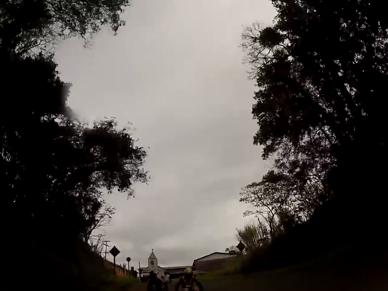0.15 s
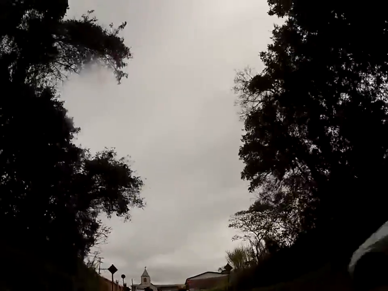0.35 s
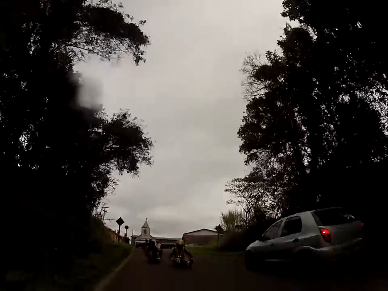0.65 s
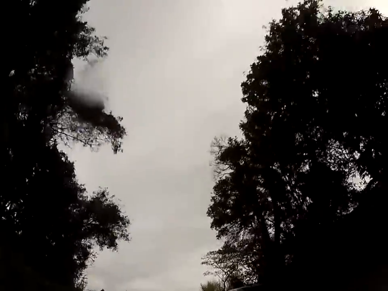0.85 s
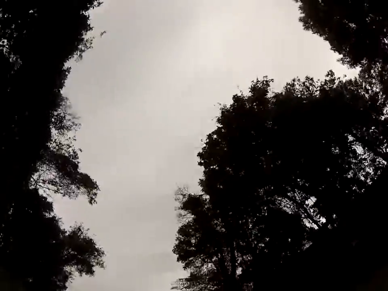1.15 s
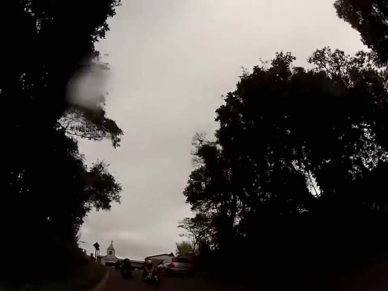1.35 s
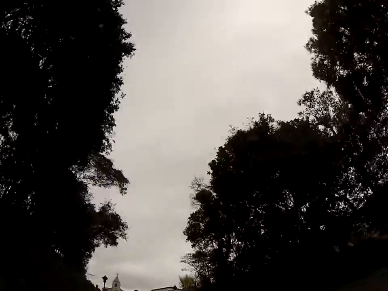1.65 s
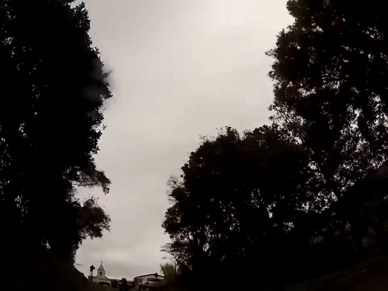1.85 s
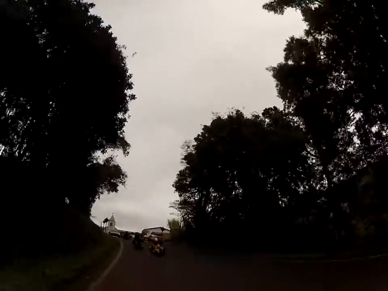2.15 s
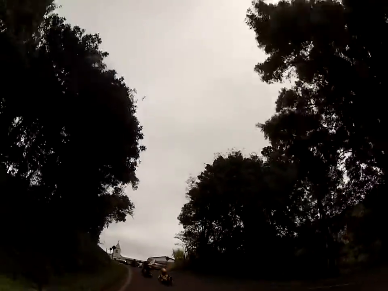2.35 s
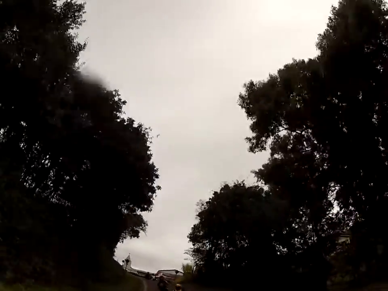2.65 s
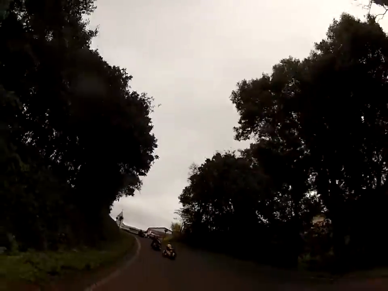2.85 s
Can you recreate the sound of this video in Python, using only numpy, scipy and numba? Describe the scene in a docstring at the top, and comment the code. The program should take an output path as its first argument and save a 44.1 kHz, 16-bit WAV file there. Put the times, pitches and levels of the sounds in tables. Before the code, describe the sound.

Continuous coarse rolling roar and faint gritty wheel hiss on a tree-lined road, with scattered rattles, a few thuds and one violent late knock, heard close through a gritty, nearly mono board-mounted microphone with low wind buffeting.

```python
"""Wheeled board on rough asphalt

A low wheeled board rolls downhill on asphalt, heard by a small microphone strapped to it.
Road grit excites deck resonances into a low roar; flickering bands of noise make the wheel hiss.
Seam slams and loose fittings are damped modes and noise bursts; low noise is wind on the port.
Hard peaks drive a gain control down; a low-rate sample-and-hold mirrors the sound upward."""
import sys
import numpy as np
from scipy import signal
from scipy.io import wavfile
from scipy.ndimage import uniform_filter1d
from numba import njit

SR = 44100
rng = np.random.default_rng(int(sys.argv[2]) if len(sys.argv) > 2 else 0)


def to_wav(s):
    """Save 16-bit WAV."""
    ch = np.atleast_2d(s).T  # columns
    pcm = np.round(np.clip(ch, -1, 1) * 32767)  # PCM
    wavfile.write(sys.argv[1], SR, pcm.astype(np.int16))


def level_to_linear(level):
    """Convert decibel levels to linear amplitude factors, elementwise."""
    exponent = np.asarray(level, float) / 20
    return 10 ** exponent


N = 132300  # samples, 3 s


def rms_one(x):
    """Normalization: scale to unit root-mean-square."""
    return x / np.sqrt(np.mean(x ** 2) + 1e-20)


def drift(rate_hz):
    """Low-pass noise: two equal real poles give a slow random course of unit rms."""
    pole = np.exp(-2 * np.pi * rate_hz / SR)
    settle = 9000  # samples dropped while the filter settles
    course = signal.lfilter([1], [1, -2 * pole, pole ** 2], rng.standard_normal(N + settle))
    return rms_one(course[settle:])


def cut(x, hz, kind, order=2):
    """Butterworth filtering: a maximally flat passband."""
    sos = signal.butter(order, hz, kind, fs=SR, output="sos")
    return signal.sosfilt(sos, x + 1e-18)


def ring(x, hz, t60):
    """Damped mode: a unit click starts a decaying sine of initial height one."""
    radius, angle = level_to_linear(-60 / (t60 * SR)), 2 * np.pi * hz / SR
    return signal.lfilter([0, np.sin(angle)], [1, -2 * radius * np.cos(angle), radius ** 2], x + 1e-18)


def swell(clicks, rise_s):
    """Critically damped response: each click becomes a short hump of the same height."""
    pole = np.exp(-1 / (rise_s * SR))
    return signal.lfilter([np.e * (1 - pole)], [1, -2 * pole, pole ** 2], clicks + 1e-18)


def grains(per_s, spread_db):
    """Random impulse train: chance clicks of uneven size and sign."""
    happens = rng.random(N) < per_s / SR
    height = level_to_linear(spread_db * np.minimum(rng.exponential(1, N), 4))
    return happens * height * rng.choice([-1, 1], N)


def marks(times, db):
    """Impulse excitation: clicks of given levels at given times."""
    out = np.zeros(N)
    np.add.at(out, (np.asarray(times) * SR).astype(int), level_to_linear(db))
    return out


# Rolling levels as the load of the wheels on the road varies:
# (time [s], deck boom level [dB], deck drone level [dB], wheel hiss level [dB])
ROLLING_LOAD = [(0, -19, -19.5, -32.5), (.12, -13, -17, -37), (.17, -21, -20.5, -30.5),
                (.22, -11.5, -17.5, -32), (.38, -13.5, -21, -38.5), (.45, -10, -13.5, -33.5),
                (.52, -12, -17, -39.5), (.56, -15, -18, -35), (.68, -14, -18.5, -30.5),
                (.8, -11.5, -15, -32.5), (.99, -16, -16.5, -35.5), (1.048, -7, -15.5, -33),
                (1.13, -8, -12.5, -32), (1.2, -7, -12, -31), (1.3, -14.5, -17, -30.5),
                (1.4, -14, -14.5, -29.5), (1.46, -10, -19.5, -33), (1.55, -14, -16.5, -32.5),
                (1.7, -13.5, -16, -32.5), (1.9, -11, -18, -35.5), (2.1, -15.5, -18.5, -38.5),
                (2.3, -10, -16, -32), (2.4, -20, -21, -37), (2.47, -12.5, -16.5, -29.5),
                (2.64, -15.5, -16, -33.5), (2.76, -16, -15.5, -30.5), (2.8, -17, -15, -37),
                (2.85, -18.5, -22, -39), (2.92, -17.5, -22, -36.5), (3, -14, -12.5, -32)]


def rolling():
    """Shared excitation: one grit drives both deck registers, and its lumps also sway the hiss."""
    time, *columns = np.transpose(ROLLING_LOAD)
    boom, drone, wheels = (level_to_linear(np.interp(np.arange(N) / SR, time, db)) for db in columns)
    lump_db = 1 * drift(29.6)  # 1 dB rms
    grit = grains(per_s=2500, spread_db=3.0) * level_to_linear(lump_db)
    roar = boom * deck_roar(grit, BOOM_MODES) + drone * deck_roar(grit, DRONE_MODES)
    return roar + wheels * wheel_hiss(lump_db)


# Low deck resonances: (frequency [Hz], bandwidth [Hz], relative level [dB])
BOOM_MODES = [(129.6, 19, -11.5), (216.4, 42.4, -3.5), (271, 25.6, 0.5), (316.8, 54.5, -3.5),
              (362.9, 74.4, -7.5)]
# Upper deck resonances: (frequency [Hz], bandwidth [Hz], relative level [dB])
DRONE_MODES = [(456, 32.4, -1.5), (556, 35, -0.5), (627, 68, -1.5), (718, 126, -3.5), (990, 280, -13)]


def deck_roar(grit, modes):
    """Modal resonance: road grit drums parallel two-pole resonators of the deck."""
    out = 0
    for k, (hz, width, db) in enumerate(modes):
        radius = np.exp(-np.pi * width / SR)
        gain = (1 - radius ** 2) / 2
        poles = [1, -2 * radius * np.cos(2 * np.pi * hz / SR), radius ** 2]
        sign = (-1) ** k  # neighbouring modes in opposite phase
        out = out + sign * level_to_linear(db) * signal.lfilter([gain, 0, -gain], poles, grit)
    out = cut(out, 696, "low", order=6)
    return rms_one(cut(out, 180, "high"))


# Colour of the wheel hiss: (frequency [Hz], relative level per hertz [dB])
HISS_COLOUR = [(700, 4), (1000, -12), (1250, 5.5), (1500, 10.5), (2000, 9), (2600, 12), (3200, 9),
               (3800, 3.5), (4400, -22), (4900, -1), (5500, 7)]


def wheel_hiss(lump_db):
    """Modulated band noise: third octaves flicker alone, together and with the lumps of the road."""
    edges = 700 * 2 ** np.arange(0, 3.1, 1 / 3)
    white = rng.standard_normal((2, N))  # neighbouring bands take turns
    hz_points, db_points = np.transpose(HISS_COLOUR)
    out = 0
    for k, (low, high) in enumerate(zip(edges, edges[1:])):
        db = np.interp(np.log(low * high) / 2, np.log(hz_points), db_points)
        own_flicker_db = 2 * drift(45)
        out = out + level_to_linear(db + own_flicker_db) * cut(white[k % 2], [low, high], "band")
    shared_flicker_db = 2.5 * drift(25.6) + 1.3 * drift(130)
    return rms_one(out * level_to_linear(shared_flicker_db + 0.2 * lump_db))


# Hard slams over road seams: (time [s], length [s], thud level [dB], knock level [dB],
# low crack level [dB], high crack level [dB])
SEAM_SLAMS = [(0.527, 0.0011, 6.5, -19.5, -19, -35.5), (0.531, 0.0019, -5, -1, -10.5, -15),
              (2.329, .003, 7, -19.5, -25, -27), (2.765, 0.0053, 10, 10.5, 6.5, 8),
              (2.774, 0.0042, 6, -8, -1, -24), (2.784, 0.009, -12, -5.5, -14, -32)]
THUD_HZ, THUD_T60_S = 527, 0.018


def slams():
    """Repeated impact: a damped thud with four blows spread over the length of each slam."""
    time, length, thud_db, *blow_db = np.transpose(SEAM_SLAMS)
    at = (time[:, None] + length[:, None] * np.linspace(0, 1, num=4)).ravel()
    dull, low, high = (marks(at, np.repeat(db, repeats=4)) for db in blow_db)
    thud = ring(marks(time, thud_db), THUD_HZ, THUD_T60_S)
    return thud + crack(low, high) + knock(dull)


# Jolts of loose fittings: (time [s], low crack level [dB], high crack level [dB], knock level [dB])
FITTING_JOLTS = [(0.062, -20, -42, -14), (0.216, -28, -34, -12.5), (0.2891, -13.5, -40, -9.5),
                 (0.2982, -18.5, -38, -7.5), (0.3297, -21, -38, -36), (0.4324, -14, -15, -19),
                 (0.4418, -5, -19, -24), (0.4488, -18, -39, -24), (0.5098, -20, -39, -10),
                 (0.514, -21, -36, -14), (0.5607, -14, -39, -1), (0.5772, -9, -34, -13),
                 (0.5854, -14, -11, -15), (0.637, -18, -46, -11.5), (0.6799, -20, -39, -18),
                 (0.9156, -16.5, -45, -10.5), (1.0394, -23, -45, -23), (1.1132, -10, -42, -22),
                 (1.1428, -5, -16, -13.5), (1.153, -14, -37, -15), (1.1774, -15, -39, -30),
                 (1.2203, -19, -37, -20), (1.244, -21, -35, -16), (1.268, -16.5, -25, -12),
                 (1.287, -13.5, -41, -8.5), (1.303, -25, -28, -15), (1.3327, -12, -37, -15.5),
                 (1.3425, -18, -29, -25), (1.3591, -12.5, -14, -36), (1.4193, -24, -38, -15),
                 (1.5324, -21, -23, -35), (1.6084, -18.5, -30, -10.5), (1.7728, -21.5, -38, -17.5),
                 (1.828, -15.5, -22, -38), (1.8615, -9, -17, -40), (2.0245, -18.5, -49, -6.5),
                 (2.0328, -17, -48, -9.5), (2.194, -33, -48, -21), (2.213, -19, -31, -9),
                 (2.4377, -21, -39, -21), (2.4914, -21, -39, -9), (2.5473, -15, -39, -13),
                 (2.5716, -34, -33, -11), (2.594, -15.5, -32, -7.5), (2.635, -33, -33, -10),
                 (2.6973, -8.5, -15, -23), (2.7442, -10, -14, -12), (2.8102, -8, -45, -2),
                 (2.818, -14, -51, -5.5), (2.904, -42, -49, -16)]


def jolts():
    """Impact excitation: listed jolts and small random rattles crack and knock the loose fittings."""
    time, low_db, high_db, knock_db = np.transpose(FITTING_JOLTS)
    rattle = level_to_linear(-36.5) * np.abs(grains(per_s=30, spread_db=1))
    low = marks(time, low_db) + rattle
    high = marks(time, high_db) + 1.14 * rattle
    dull = marks(time, knock_db) + 1.7 * rattle
    return crack(low, high) + knock(dull)


CRACK_RISE_S, CRACK_EDGES_HZ = 0.0011, (1560, 3360, 8200)


def crack(low, high):
    """Enveloped noise: bright bursts in two bands, with peaks near the click heights."""
    bottom, middle, top = CRACK_EDGES_HZ
    out = 0
    for clicks, band in ((low, [bottom, middle]), (high, [middle, top])):
        noise = rms_one(cut(rng.standard_normal(N), band, "band"))
        out = out + swell(clicks, CRACK_RISE_S) * noise / 2
    return out


# Modes of the mount: (frequency [Hz], drive level [dB], 60 dB decay time [s])
MOUNT_MODES = [(820, -5, 0.0072), (928, 14.5, 0.012), (1174, -1.5, .012), (1535, -13.5, 0.013),
               (1830, -22, 0.017)]
KNOCK_RISE_S = 0.0023


def knock(clicks):
    """Modal noise: humps gate randomly driven mount modes, so the pitch mix differs by blow."""
    modes = sum(level_to_linear(db) * ring(rng.standard_normal(N), hz, t60) for hz, db, t60 in MOUNT_MODES)
    colour = rms_one(modes)
    even = colour / np.sqrt(uniform_filter1d(colour ** 2, size=220) + 0.3)  # levels out its swells
    return swell(clicks, KNOCK_RISE_S) * even / np.sqrt(2)


# Wind on the microphone port: (time [s], level [dB])
WIND_GUSTS = [(0, -23), (.2, -24.5), (.5, -24.5), (.9, -26.5), (1.1, -23.5), (1.3, -35.5), (1.55, -22),
              (2, -23.5), (2.3, -24.5), (2.45, -20), (2.65, -27), (3, -21)]


def wind():
    """Pressure buffeting: lumpy low-band noise on the microphone port swells in gusts."""
    time, db = np.transpose(WIND_GUSTS)
    gust = level_to_linear(np.interp(np.arange(N) / SR, time, db))
    low_noise = cut(rng.standard_normal(N), [33.5, 120], "band", order=1)
    lumps = level_to_linear(2.5 * drift(12.3))  # 2.5 dB rms
    return gust * rms_one(low_noise * lumps)


def side_rumble():
    """Antiphase stereo: faint deep noise enters left and right with opposite signs."""
    rumble = level_to_linear(-44) * rms_one(cut(rng.standard_normal(N), 80, "low"))
    return rumble * np.array([[1], [-1]])


def scene():
    """Superposition: all sources add alike in both channels, except the faint side rumble."""
    mono = rolling() + slams() + jolts() + wind()
    return mono + side_rumble()


@njit
def duck_db(over_db, attack, hold, release):
    """Peak-hold gain control: loss chases the excess quickly, holds, then lets go slowly."""
    out, aim, loss, since = np.zeros(len(over_db)), 0., 0., 0
    for i in range(len(over_db)):
        since += 1
        if over_db[i] >= aim:
            aim, since = over_db[i], 0
        elif since > hold:
            aim *= release
        loss += attack * (aim - loss)
        out[i] = loss
    return out


def gain_control(dry):
    """Dynamic compression: peaks over the limit lower both channels together."""
    limit_db, attack_s, hold_s, release_s = -0.1, 0.0012, 0.025, 0.11
    level_db = 20 * np.log10(np.abs(dry.mean(axis=0)) + 1e-9)
    over_db = np.maximum(level_db - limit_db, 0)
    loss_db = duck_db(over_db, 1 / (attack_s * SR), hold_s * SR, np.exp(-1 / (release_s * SR)))
    return dry * level_to_linear(-loss_db)


def sample_and_hold(x):
    """Spectral imaging: 12 kHz samples, each held four times, mirror the sound above 6 kHz."""
    slow = signal.resample_poly(x, 40, 147, axis=1)  # 44.1 to 12 kHz
    held = np.repeat(slow, 4, axis=1)  # 48 kHz
    return signal.resample_poly(held, 147, 160, axis=1)[:, :N]  # back to 44.1 kHz


def band_limit(x):
    """A steep low-pass at the top of the band."""
    return signal.sosfilt(signal.butter(12, 16310, fs=SR, output="sos"), x)


def record(dry):
    """Signal chain: gain control, clipping, band limiting, sample-and-hold and a top cut."""
    clipped = np.clip(gain_control(dry), -0.97, 0.97)
    limited = cut(clipped, 5330, "low", order=8)
    top_cut = signal.cheby2(24, 60, 15650, fs=SR, output="sos")  # 60 dB down from 15650 Hz up
    mix = np.clip(signal.sosfilt(top_cut, sample_and_hold(limited)), -1, 1)
    return band_limit(mix)


dry = scene()
out = record(dry)
to_wav(out)
```